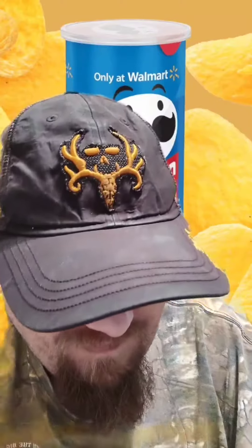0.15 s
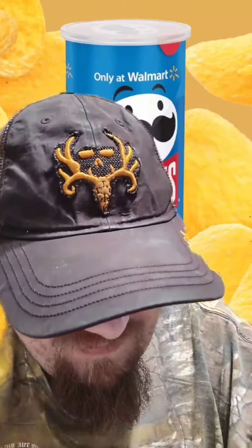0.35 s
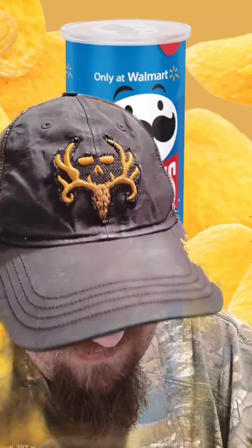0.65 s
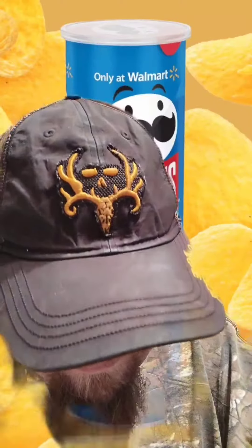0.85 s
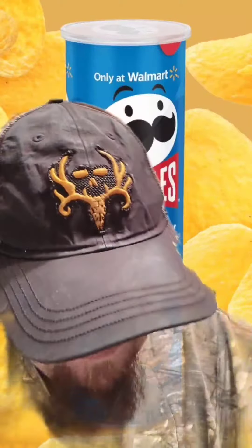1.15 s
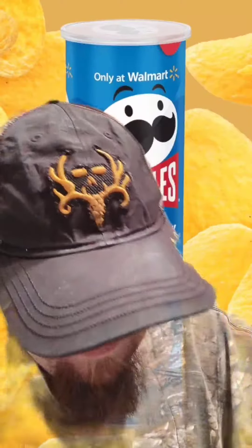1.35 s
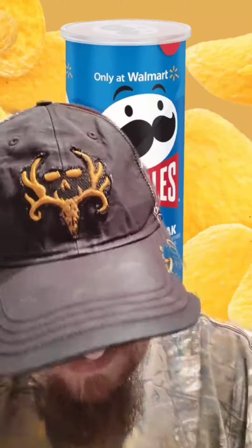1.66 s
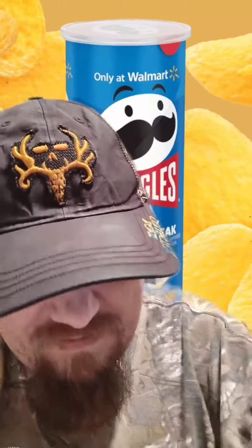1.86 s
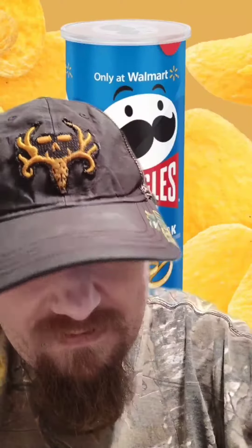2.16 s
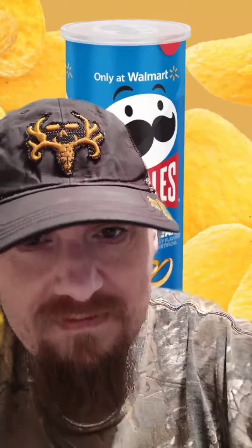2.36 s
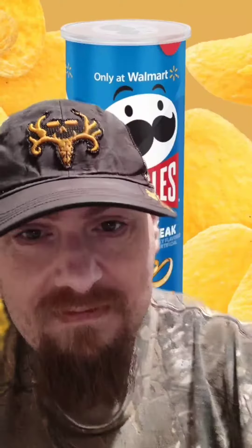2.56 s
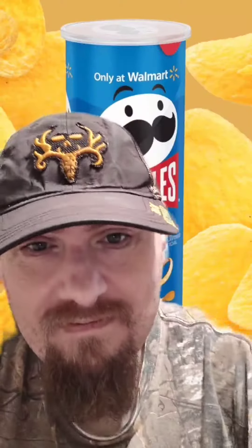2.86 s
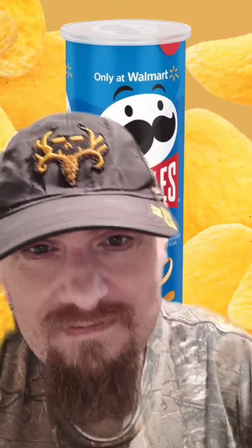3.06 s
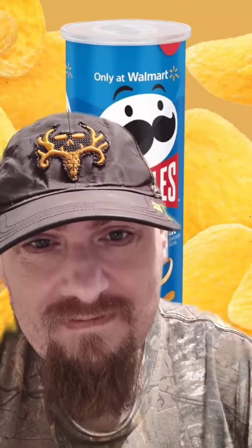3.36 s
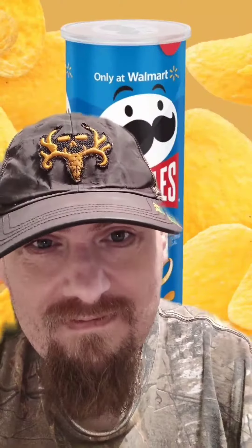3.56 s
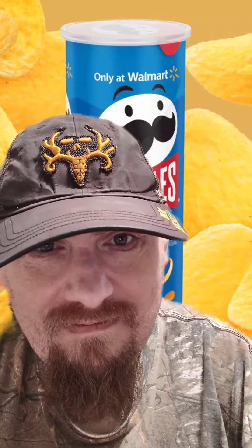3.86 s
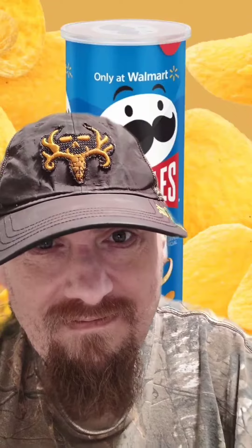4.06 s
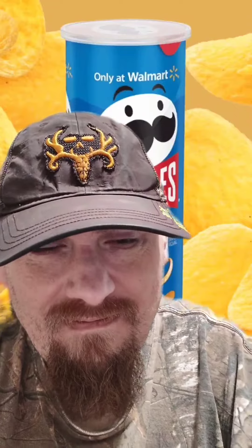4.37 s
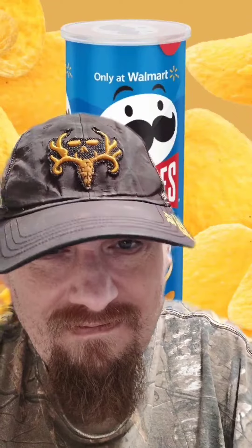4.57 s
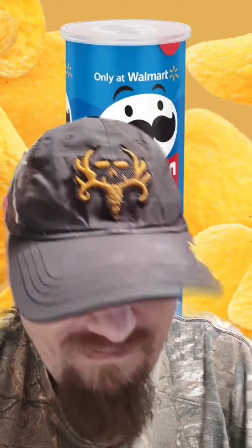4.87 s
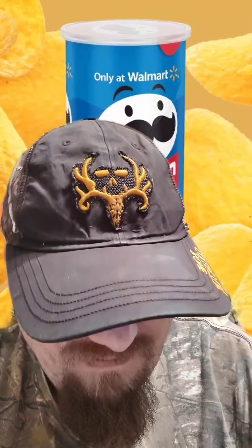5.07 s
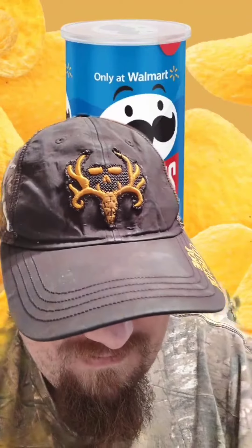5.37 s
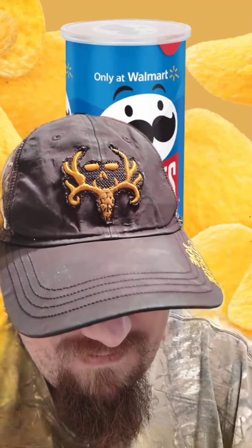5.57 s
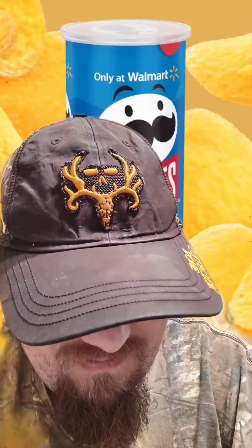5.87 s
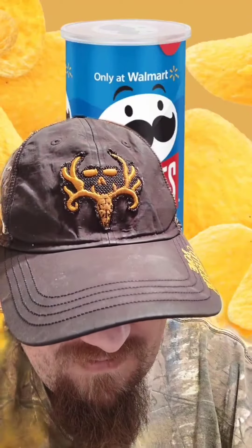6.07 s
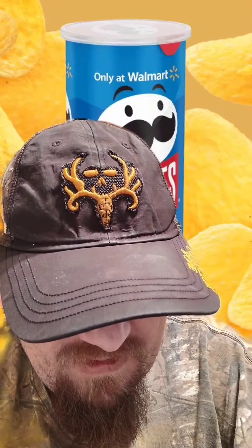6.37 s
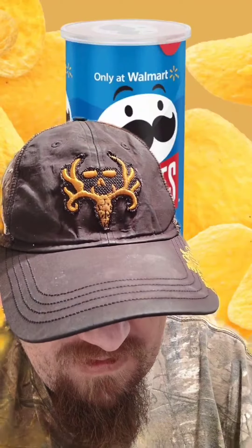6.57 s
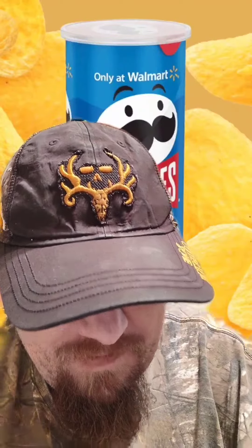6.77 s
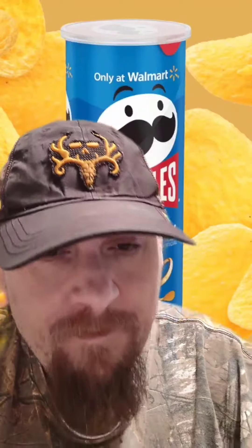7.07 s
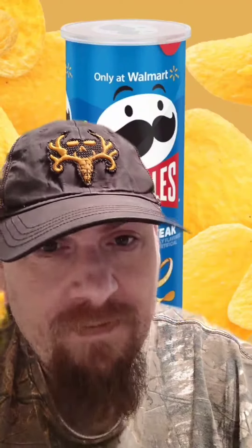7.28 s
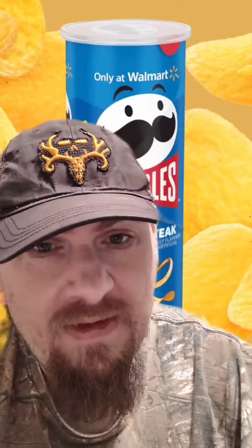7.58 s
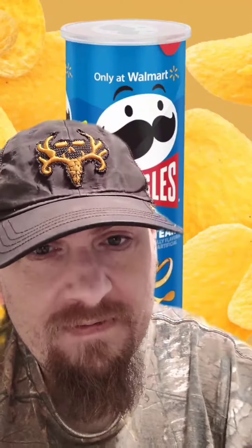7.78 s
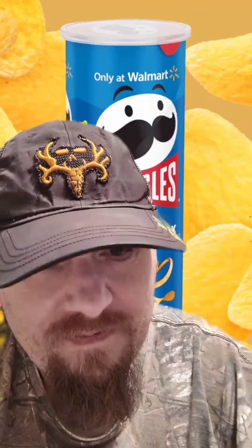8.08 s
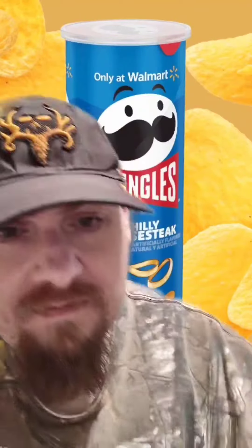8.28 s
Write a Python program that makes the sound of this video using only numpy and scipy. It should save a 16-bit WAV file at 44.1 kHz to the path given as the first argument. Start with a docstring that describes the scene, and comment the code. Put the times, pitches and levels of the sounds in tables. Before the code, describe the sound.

Fingers rustle on a cardboard snack can, and its plastic lid clicks and snaps off with a brief rattle. After a pause dotted with small ticks, the foil seal opens with a hollow pop, then peels and crinkles. Crisps knock and slide inside the tube. The can is close to the microphone in a small room, with a faint fan hum behind it.

```python
"""Fingers rustle on a cardboard snack can; its plastic lid clicks over the rim and snaps off, and a
brief rattle follows. After a pause dotted with small ticks, the foil seal pops, peels and crinkles,
sounding the air in the tube; then the crisps knock and slide inside. The can is close to a phone
microphone in a small room. Behind it a fan hums, and a faint low rumble swells once and fades."""
import sys
import numpy as np
from scipy import signal
from scipy.fft import rfft, irfft, next_fast_len
from scipy.io import wavfile
from scipy.ndimage import map_coordinates

SR = 44100
rng = np.random.default_rng(int(sys.argv[2]) if len(sys.argv) > 2 else 0)


def master(y):
    """Save y as 16-bit WAV."""
    cut = np.clip(np.atleast_2d(y).T, -1, 1)
    pcm = np.round(cut * 32767)  # scale
    wavfile.write(sys.argv[1], SR, pcm.astype(np.int16))


N = 371013
T = np.arange(SR // 3) / SR  # time within one short event [s]
NOW = np.arange(N) / SR  # time within the scene [s]

# Levels in the tables are relative: each source adds its own gain.
# decay of the small room: (frequency [Hz], t60 [s])
ROOM_DECAY = [(100, 0.47), (400, 0.36), (1200, .26), (2200, 0.23), (4200, .2), (11000, 0.16)]
# what the walls return: (frequency [Hz], level [dB])
WALL_SPECTRUM = [(100, -3.5), (300, -3), (900, -4.5), (2000, 1), (4000, 0), (7000, 6), (12000, 5.5)]
# room tone: (frequency [Hz], level [dB])
AIR_SPECTRUM = [(20, -21.5), (55, -12), (118, -14), (200, -14.5), (360, -15), (480, -20.5), (700, -24),
                (1300, -23), (1900, -25.5), (2600, -30), (4200, -26.5), (7000, -35.5), (14000, -38)]
# lines of the fan's hum: (frequency [Hz], level [dB])
FAN_LINES = [(118, -80.5), (293, -76), (361, -74), (647, -84)]
# skin rubbing on the can: (frequency [Hz], level [dB])
SKIN_SPECTRUM = [(240, -32.5), (400, -6.5), (457, -5.5), (867, -0.5), (1050, -6.5), (1910, -8.5),
                 (2150, -4.5), (3670, -6.5), (14000, -33)]
# fingers work round the can: (time [s], length [s], level [dB], change over the hold [dB])
FINGER_HOLDS = [(0.0, 0.3, -60.5, -12.5), (.35, 1.4, -76, -2.5), (1.765, 1.01, -68, 3),
                (2.738, 0.72, -65, -5), (3.496, 0.51, -74, 4), (4.247, 0.53, -71, -1),
                (5.42, 0.274, -69, -2.5)]
# fingertips brush the can: (middle time [s], level [dB], length [s], centre [Hz])
FINGER_BRUSHES = [(0.19, -63.5, 0.21, 715), (0.41, -70, 0.19, 890), (0.71, -59, 0.049, 460),
                  (.72, -69, 0.06, 1180), (1.716, -49, 0.054, 2050), (1.72, -60.5, 0.081, 9000),
                  (2.41, -58.5, 0.041, 10950), (3.191, -61, 0.046, 3670), (3.361, -55, 0.069, 3020),
                  (3.577, -58.5, 0.048, 3000), (3.584, -60.5, 0.021, 1100), (3.662, -60.5, 0.029, 3260),
                  (3.961, -63, 0.093, 1500), (4.29, -66, 0.047, 2176), (4.427, -64.5, 0.039, 3500),
                  (5.778, -52, 0.024, 1260), (6.123, -65, .03, 890), (6.64, -59, 0.23, 1260)]
# small ticks: (time [s], level [dB], pitch [Hz], crack level [dB])
SMALL_TICKS = [(0.325, -50, 930, -17), (0.915, -49, 3200, -2), (1.237, -51.5, 2960, -5),
               (1.362, -37.5, 1520, -31), (1.692, -34.5, 2800, 18.5), (1.839, -36.5, 875, -12),
               (2.112, -48, 2180, -1), (2.216, -51, 2000, -3), (2.396, -40, 2033, -0.5),
               (2.6804, -28, 1570, -22), (2.819, -40.5, 2320, -4.5), (2.825, -48, 2230, -4),
               (2.972, -45, 1870, 1), (3.029, -43, 2590, 10.5), (3.039, -36.5, 3900, -2.5),
               (3.147, -47.5, 4860, -6.5), (3.2373, -48, 8000, 2), (3.247, -29.5, 1590, -17),
               (3.656, -51.5, 3500, -20), (3.865, -44.5, 1910, -17), (3.945, -43.5, 1330, -4.5),
               (4.507, -52, 1320, -21), (7.702, -39, 2700, -15), (7.744, -40, 2070, -10),
               (7.753, -29, 2390, -9), (7.9728, -34.5, 3600, -4.5), (8.115, -46, 1770, -6),
               (8.205, -46.5, 4060, -9)]
# crisps scraping on cardboard: (frequency [Hz], level [dB])
SCRAPE_SPECTRUM = [(71, -41), (120, -8.5), (155, -9), (251, 1), (325, -4), (447, -2.5), (524, -10),
                   (862, -5), (1070, -8.5), (1360, -12.5), (1800, -10.5), (3840, -13), (5830, -22.5),
                   (14000, -34)]
# crisps slide in the tilted tube: (time [s], length [s], level [dB], change over the slide [dB])
CRISP_SLIDES = [(5.724, 0.046, -53, -1.5), (5.817, .36, -60.5, 1.5), (6.332, 0.41, -57, 1),
                (6.76, .22, -62, 3), (7.081, .26, -57, 0.5), (7.38, 0.25, -45.5, -5.5),
                (7.679, 0.38, -59.5, 2), (8.057, 0.33, -61.5, -6)]
# knocks in the tube: (time [s], level [dB], brightness [dB/octave], spot pitch [Hz])
TUBE_KNOCKS = [(5.785, -37.5, -4, 1260), (6.11, -36, 5, 860), (6.249, -34.5, -1, 3150),
               (6.417, -42, 5, 1800), (6.455, -40.5, 8, 1540), (6.7, -40.5, 6, 2260),
               (6.865, -37.5, -9.5, 706), (6.944, -35, 3, 860), (6.974, -24.5, 1, 2110),
               (6.979, -22, -1.5, 769), (7.126, -30, -5, 880), (7.139, -27, -2.5, 700),
               (7.197, -32, -3.5, 766), (7.266, -32, -1, 1096), (7.346, -35.5, 4.5, 750.0),
               (7.4128, -25, 1.5, 1013), (7.444, -15, -2.5, 924), (7.451, -21.5, -2, 1085),
               (7.462, -23.5, -4.5, 876), (7.473, -27.5, -5, 990), (7.482, -27.5, -0.5, 778),
               (7.521, -27, -0.5, 1790), (7.582, -28.5, -4.5, 724), (7.904, -37, -4, 740),
               (8.025, -41, -7, 423)]
# modes of the open cardboard tube: (frequency [Hz], level [dB], t60 [s])
TUBE_RESONANCES = [(253, -11, 0.077), (443, -37, 0.043), (794, -8, 0.04), (1073, -7, 0.046),
                   (2000, 1.5, 0.01), (2470, -5, 0.018), (3420, 0.5, 0.0063)]
# the air in the tube is pushed: (time [s], level [dB], pitch [Hz], t60 [s])
AIR_THUMPS = [(0.22, -38.5, 164, 0.062), (0.854, -39.5, 131.7, 0.051), (1.0202, -24, 120, 0.054),
              (1.021, -19, 205, 0.083), (4.615, -12.5, 107, 0.059), (4.62, -19.5, 191, 0.15),
              (6.523, -31, 161, 0.022)]
# foil tearing from its glue: (frequency [Hz], level [dB])
TEAR_SPECTRUM = [(88, -42.5), (160, -8), (280, -3), (430, -4.5), (510, -11), (720, -4.5), (1190, -10),
                 (1490, -12), (2400, -11), (3800, -14.5), (6070, -27.5), (13200, -25)]
# pulls on the foil: (time [s], length [s], level [dB], change [dB], treble [dB], air note [dB])
FOIL_PULLS = [(4.611, 0.1, -36.5, -9, 4.5, 0.5), (4.815, 0.045, -52, -1, 5, -21),
              (4.857, 0.077, -36, 2, -6.5, -2), (4.924, 0.051, -34, -5, 7.5, -1),
              (4.978, .1, -36, -1, -2, -19), (5.082, 0.0467, -36, 4.5, -7, -15),
              (5.313, .037, -41.5, -3, 1, -28), (5.36, 0.021, -41, 3, -12, -14)]
# foil creases snap: (time [s], level [dB], brightness [dB/octave], crease pitch [Hz])
FOIL_CREASES = [(4.617, -14.5, -2, 4930), (4.6215, -6, -2.5, 4500), (4.631, -24, -9, 4260),
                (4.64, -15.5, -2, 4700), (4.663, -16, -2, 3270.0), (4.6718, -13.5, 2.5, 2600),
                (4.6972, -9, 0, 3220), (4.7125, -25, 4, 5340), (4.716, -23, -3, 4640),
                (4.765, -34, -17, 820), (4.8028, -24.5, -5, 1500), (4.8105, -24, -3, 2010),
                (4.8158, -16.5, 0.5, 1850), (4.9245, -5, 3.5, 3530), (4.9485, -15.5, -2, 3000),
                (4.997, -17, 2, 2480), (5.0402, -18, -3.5, 2500), (5.0705, -24, -5, 2140),
                (5.093, -20.5, -10, 860), (5.127, -17, 0.5, 2120), (5.178, -20.5, -0.5, 1350),
                (5.2412, -21.5, -4.5, 2230), (5.25, -26.5, -0.5, 980), (5.265, -31, -13, 2270),
                (5.3075, -22, -4.5, 4350), (5.3165, -23, 12, 1800), (5.3392, -20.5, 11, 2380),
                (5.344, -25, 18, 3680), (5.367, -26.5, -3, 2380), (5.382, -26.5, -10, 656),
                (5.7375, -29.5, 5, 1114)]
# modes of the stretched foil: (frequency [Hz], level [dB], t60 [s])
FOIL_RESONANCES = [(782, -12.5, 0.017), (1248, -12, 0.014), (1930, -15, 0.015), (2365, -3.5, 0.0098),
                   (3180, -9, 0.02), (3850, -3.5, 0.011), (5130, -3, 0.0066), (6850, -19, 0.017)]
# the lid clicks over the rim and snaps off, followed by a brief rattle:
# (time [s], level [dB], brightness [dB/octave], spot pitch [Hz])
LID_CLICKS_AND_RATTLE = [(0.377, -37.5, -1, 875), (0.4845, -17.5, -1.5, 1136), (0.794, -21.5, 3.5, 1274),
                         (0.813, -34, 1.5, 1343), (0.829, -33, -4.5, 840.0), (0.856, -43, -4, 1220.0),
                         (0.941, -21.5, 0.5, 1143), (0.9495, -16.5, 2.5, 862.6), (0.977, -29, 3.7, 1366),
                         (0.9865, -21, 3.5, 1450.0), (0.9998, -7, 0.1, 818), (1.004, -2, -1, 1220),
                         (1.0222, -3.5, 0.3, 866.5), (1.024, -2.5, 4, 860.0), (1.032, -15, -0.5, 2440.0),
                         (1.042, -18, 2.5, 1060.0), (1.048, -16, 0.6, 855), (1.066, -19, 7, 826),
                         (1.072, -13.5, 1, 920.0), (1.13, -29, -2, 2300), (1.156, -24, -1, 1930.0)]
# modes of lid and rim: (frequency [Hz], level [dB], t60 [s])
LID_RESONANCES = [(196, -20.5, 0.032), (324, -13.5, 0.039), (416, -11.5, 0.045), (833, -6, .015),
                  (881, -5.5, 0.021), (1370, -2, 0.0091), (2010, -0.5, 0.0047), (2660, -1, .005),
                  (3470, -10.5, 0.01), (4097, -2, 0.005), (5060, -8, 0.0052)]


def amp(db):
    """Decibels to gain."""
    return 10 ** (np.asarray(db) / 20)


def unit(x):
    """Scale to rms 1."""
    return x / np.sqrt(np.mean(x ** 2) + 1e-20)


def along(points, hz):
    """Read (frequency, value) points on a log axis."""
    knots_hz, values = np.transpose(points)
    return np.interp(np.log(hz + 1), np.log(knots_hz + 1), values)


def wobble(rate):
    """A smooth random curve, rate knots a second."""
    return map_coordinates(rng.standard_normal(int(N * rate / SR) + 4), [NOW * rate])


def filtered(x, response):
    """Weight x by a function of frequency."""
    size = next_fast_len(len(x) + SR // 2)
    return irfft(rfft(x, size) * response(np.fft.rfftfreq(size, 1 / SR)), size)[:len(x)]


def low_cut(x, hz):
    """Roll off the bass below a corner."""
    return signal.sosfilt(signal.butter(2, hz, "highpass", fs=SR, output="sos"), x)


def high_cut(x, hz):
    """Gently roll off the treble above a corner."""
    return signal.sosfilt(signal.butter(1, hz, fs=SR, output="sos"), x)


def coloured(x, spectrum):
    """Give x a spectrum, at rms 1."""
    return unit(filtered(x, lambda hz: amp(along(spectrum, hz))))


def add(track, s, x):
    """Mix x into the track at time s."""
    part = track[round(s * SR):][:len(x)]
    part += x[:len(part)]


def grains(rate, spread_db):
    """Tiny slips at random moments and of random sizes, rms 1."""
    impulses = (rng.random(N) < rate / SR) * rng.choice([-1, 1], N)
    return unit(impulses * amp(spread_db * np.clip(rng.standard_normal(N), -2, 2)))


def resonance(hz, width_hz):
    """Narrow noise that follows a pitch curve."""
    phase = 2 * np.pi * np.cumsum(hz) / SR
    return unit(wobble(width_hz) * np.sin(phase) + wobble(width_hz) * np.cos(phase))


def crackle(start, end, rate, spread_db, cycles, spectrum):
    """Tiny fractures, each a few cycles at its own pitch; rms 1 from start to end."""
    length = end - start
    when, pitch, chance = rng.random((int(rate * length), 3)).T[:, :, None]
    hz = 500 * 28 ** pitch
    samples = np.arange(SR // 150)
    size = amp(spread_db * np.minimum(-np.log(chance), 3)) * hz  # short high grains start taller
    turns = hz * samples / SR
    waves = size * np.sin(2 * np.pi * turns) * amp(-60 * turns / cycles)
    where = ((start + when * length) * SR).astype(int) + samples
    track = np.bincount(where.ravel(), waves.ravel(), N)[:N]
    return coloured(track, spectrum) * np.sqrt(length * SR / N)


def stroke(start, length, db, change_db, attack_s, release_t60):
    """Gain of one movement: it sets in, grows or eases steadily, and dies away."""
    age = NOW - start
    onset = np.clip(age / attack_s, 0, 1)
    held_db = db + change_db * np.clip(age / length, 0, 1)
    return onset * amp(held_db - 60 * np.maximum(age - length, 0) / release_t60)


def in_room(x, wet_db, ceiling_s=0.0185, ceiling_db=-8):
    """What reaches the close microphone: direct sound, a ceiling bounce and a diffuse tail."""
    hz, t, noise = signal.stft(rng.standard_normal(SR // 2), SR, nperseg=256)
    tail = signal.istft(noise * amp(-60 * t / along(ROOM_DECAY, hz)[:, None]), SR, nperseg=256)[1]
    tail *= 1 - np.exp(-np.arange(len(tail)) / SR / 0.003)
    tail = filtered(tail / np.linalg.norm(tail), lambda f: amp(along(WALL_SPECTRUM, f)))
    tail[round(ceiling_s * SR)] += amp(ceiling_db)
    response = amp(wet_db) * tail
    response[0] += 1
    return signal.fftconvolve(x, response)


def strikes(rows, modes, spot_db, spot_cycles, crack_db, crack_t60, wet_db, gain_db):
    """Each blow rings the modes and the spot it hits; harder contact favours the high modes."""
    track = np.zeros(N)
    hz, level, t60 = np.transpose(modes)[:, :, None]
    onset = 1 - np.exp(-(T / 0.00036) ** 2)
    for s, db, bright, spot_hz in rows:
        size, detune, phase = rng.standard_normal((3, len(modes), 1))
        gains = amp(level + 2 * size + bright * np.log2(hz / 1500) - 60 * T / t60)
        waves = np.sin(2 * np.pi * hz * (1 + 0.054 * detune) * T + np.pi * phase)
        ring = np.sum(gains * waves, axis=0)
        spot = amp(spot_db - 60 * T * spot_hz / spot_cycles) * np.sin(2 * np.pi * spot_hz * T)
        crack = amp(crack_db + 2 * bright - 60 * T / crack_t60) * rng.standard_normal(len(T))
        crack = high_cut(crack, hz=7500)  # soft materials blunt its top
        blow = low_cut((ring + spot + crack) * onset, hz=80)
        add(track, s, in_room(amp(db + gain_db) * blow / np.linalg.norm(blow), wet_db))
    return track


def room_tone(level_db=-66):
    """The steady air of the small room."""
    return amp(level_db) * coloured(rng.standard_normal(N), AIR_SPECTRUM)


def fan():
    """A fan hums in the background, each line unsteady in level and phase."""
    return np.sqrt(2) * sum(amp(db + 1.3 * wobble(20)) * np.sin(2 * np.pi * hz * NOW + 0.6 * wobble(8.1))
                            for hz, db in FAN_LINES)


def rumble(peak_s=2.42, half_width_s=0.31, gain_db=-57, peak_hz=100, sag_octaves_per_s=0.72):
    """A faint low rumble swells once and sinks in pitch, with rough noise around it."""
    age = NOW - peak_s
    hz = peak_hz * 2 ** (-sag_octaves_per_s * age)
    swell = amp(gain_db) / (1 + np.abs(age / half_width_s) ** 5)
    tone = unit(np.sin(2 * np.pi * np.cumsum(hz) / SR) + 0.7 * resonance(hz, width_hz=25))
    spectrum = [(25, -20.5), (55, -3), (70, -13), (120, 0.5), (190, -1.5), (300, -13.5), (600, -36)]
    rough = coloured(rng.standard_normal(N), spectrum)
    return swell * (tone + amp(-9) * rough)


def fingers(hold_db=-1):
    """Skin slips on the can: a faint close rustle with short brushing strokes."""
    pressure = sum(stroke(*hold, attack_s=0.011, release_t60=0.2) for hold in FINGER_HOLDS)
    pressure *= amp(hold_db + 2.3 * wobble(10))
    track = pressure * coloured(grains(rate=2200, spread_db=6), SKIN_SPECTRUM)
    slips = grains(rate=6300, spread_db=9)
    for s, db, length, centre_hz in FINGER_BRUSHES:
        piece = slips[int(s * SR):][:len(T)]
        band = filtered(piece, lambda hz: 1 / (1 + np.log2((hz + 1) / centre_hz) ** 2 / 0.44))
        swell = np.exp(-3.04 * ((T - T.mean()) / length) ** 2)
        add(track, s - T.mean(), amp(db) * unit(band) * swell)
    return track


def ticks(cycles=22.4, gain_db=1.5):
    """A tick is a brief ring of three close modes with a tiny dry crack; higher rings die sooner."""
    track = np.zeros(N)
    for s, db, hz, crack_db in SMALL_TICKS:
        modes = sum(gain * np.sin(2 * np.pi * ratio * hz * T)
                    for ratio, gain in [(0.94, 1), (1.25, -0.66), (1.59, 0.29)])
        ring = low_cut(modes * np.minimum(T * hz, 1) * amp(-60 * T * hz / cycles), hz / 2)
        crack = high_cut(rng.standard_normal(len(T)), hz=4500) * amp(-60 * T / 0.016)
        tick = (ring + amp(crack_db + 2.5) * low_cut(crack, hz=160)) / np.hypot(1, amp(crack_db))
        add(track, s, in_room(amp(db + gain_db) * tick, wet_db=-8.5))
    return track


def air_note(unseal_s=4.62, time_constant_s=0.22, sealed_hz=177.8, open_hz=244.8):
    """The pitch of the air in the tube rises as the seal comes away."""
    return open_hz + (sealed_hz - open_hz) * np.exp(-np.maximum(NOW - unseal_s, 0) / time_constant_s)


def crisp_scrape(tube_hz, shake_db=-20, note_db=-5, overtone_db=-8, slips_db=-4, gain_db=-0.5):
    """Crisps stick and slip on cardboard in slides and after knocks; slides also blow the air note."""
    slide_power = sum(stroke(*slide, attack_s=0.019, release_t60=0.27) ** 2 for slide in CRISP_SLIDES)
    shake_power = sum(stroke(s, 0.0046, db + shake_db, 0, attack_s=0.0028, release_t60=0.14) ** 2
                      for s, db, _, _ in TUBE_KNOCKS)
    scrape = crackle(5.68, 8.4, rate=1300, spread_db=2, cycles=8.2, spectrum=SCRAPE_SPECTRUM)
    scrape += amp(slips_db) * coloured(grains(rate=900, spread_db=3.5), SCRAPE_SPECTRUM)
    scrape *= amp(3.2 * wobble(70) - 1)
    scrape += amp(overtone_db) * resonance(3 * tube_hz, width_hz=220)  # a higher mode of the tube
    hollow = amp(note_db) * resonance(tube_hz, width_hz=65)
    shifting = np.sqrt(slide_power + shake_power) * scrape + np.sqrt(slide_power) * hollow
    return in_room(amp(gain_db) * shifting, wet_db=-8.5)[:N]


def tube_knocks():
    """Crisps and fingers knock inside the open tube and ring the cardboard."""
    return strikes(TUBE_KNOCKS, TUBE_RESONANCES, spot_db=3, spot_cycles=39,
                   crack_db=-9.5, crack_t60=0.015, wet_db=-7.5, gain_db=14.5)


def air_thumps():
    """The air column booms when pushed, most as the lid or seal lets go."""
    track = np.zeros(N)
    onset = 1 - np.exp(-T / 0.0015)
    for s, db, hz, t60 in AIR_THUMPS:
        boom = -np.sin(2 * np.pi * hz * T) * amp(db - 60 * T / t60) * onset
        add(track, s, in_room(boom, wet_db=-14))
    return track


def foil_peel(tube_hz, slips_db=-5, crinkle_db=-2, gain_db=-0.7):
    """The glue gives way in dense tiny snaps that blow the air note; the foil crinkles as it bends."""
    snaps = crackle(4.6, 5.45, rate=1200, spread_db=4, cycles=3.9, spectrum=TEAR_SPECTRUM)
    snaps += amp(slips_db) * coloured(grains(rate=1500, spread_db=0.5), TEAR_SPECTRUM)
    snaps *= amp(2.5 * wobble(110) - 1)  # the seal lets go in short runs
    crinkle = coloured(grains(rate=130, spread_db=2.5), TEAR_SPECTRUM)
    snaps += amp(crinkle_db) * low_cut(crinkle, hz=700)
    body = filtered(snaps, lambda hz: 1 / (1 + (hz / 3600) ** 4))
    note = resonance(tube_hz, width_hz=50)
    tear = np.zeros(N)
    for s, length, db, change_db, treble_db, note_db in FOIL_PULLS:
        pull = stroke(s, length, db, change_db, attack_s=0.0037, release_t60=0.039)
        tear += pull * (body + amp(treble_db) * (snaps - body) + amp(note_db) * note)
    return in_room(amp(gain_db) * tear, wet_db=-10)[:N]


def foil_snaps():
    """Creases snap and ring the stretched foil."""
    return strikes(FOIL_CREASES, FOIL_RESONANCES, spot_db=5.5, spot_cycles=17.4,
                   crack_db=-4.5, crack_t60=0.01, wet_db=-10, gain_db=11)


def lid_opening():
    """Close to the microphone, the lid clicks over the rim and snaps off; a brief rattle follows."""
    return strikes(LID_CLICKS_AND_RATTLE, LID_RESONANCES, spot_db=2, spot_cycles=16,
                   crack_db=-9, crack_t60=0.0069, wet_db=-6.5, gain_db=13.5)


def scene():
    """Lid, seal and crisps up close, the quiet room behind, in mono."""
    tube_hz = air_note()
    impacts = lid_opening() + foil_snaps() + tube_knocks() + ticks() + air_thumps()
    handling = foil_peel(tube_hz) + crisp_scrape(tube_hz) + fingers()
    background = room_tone() + fan() + rumble()
    return (impacts + handling + background)[None]


def record(dry):
    """The phone microphone drops the deepest bass and everything above its band limit."""
    top_hz = 14050
    return filtered(low_cut(dry[0], hz=50), lambda hz: 1 / np.sqrt(1 + (hz / top_hz) ** 140))[None]


dry = scene()
out = record(dry)
master(out)
```